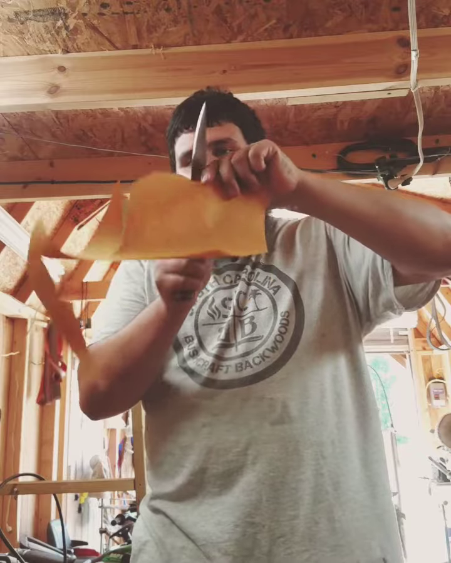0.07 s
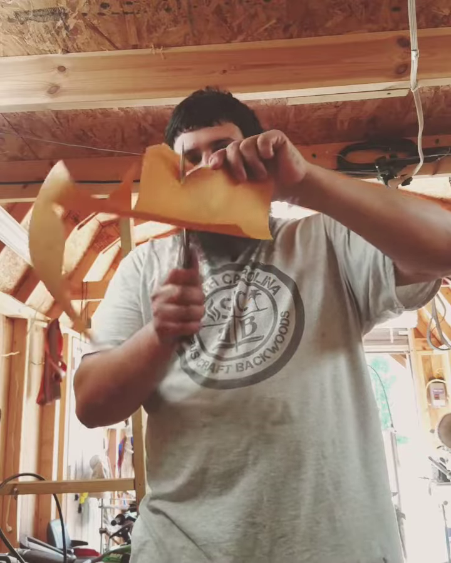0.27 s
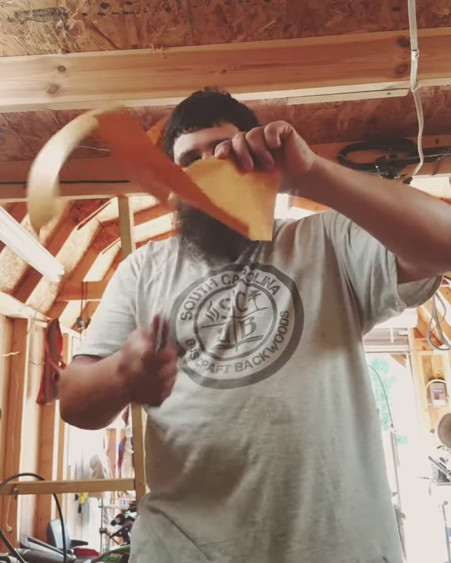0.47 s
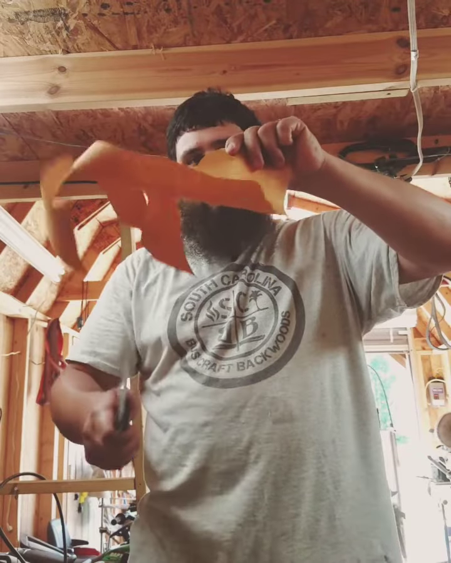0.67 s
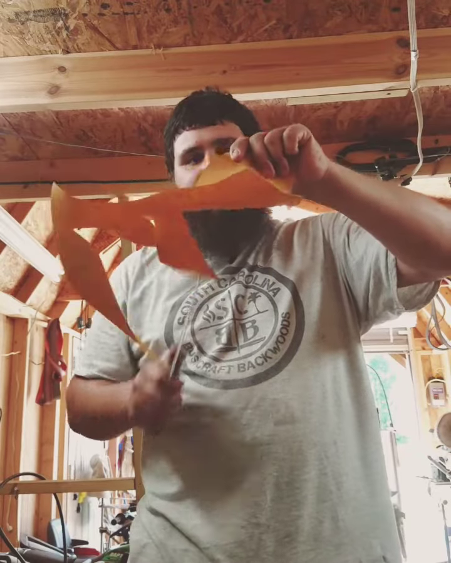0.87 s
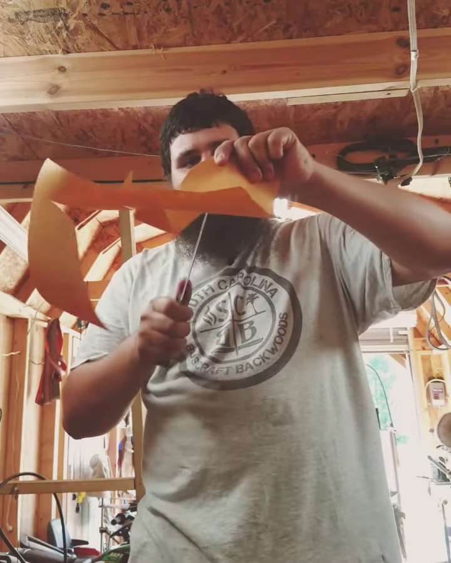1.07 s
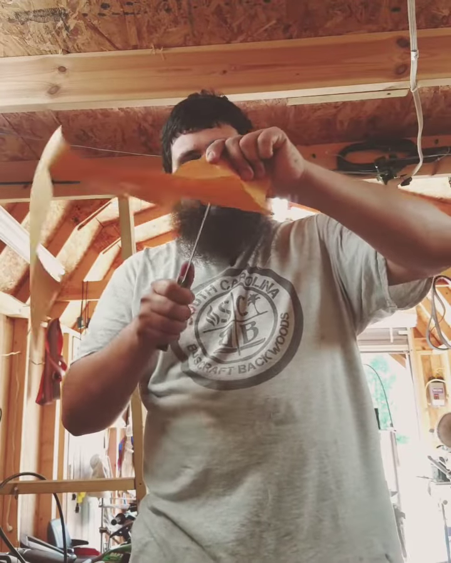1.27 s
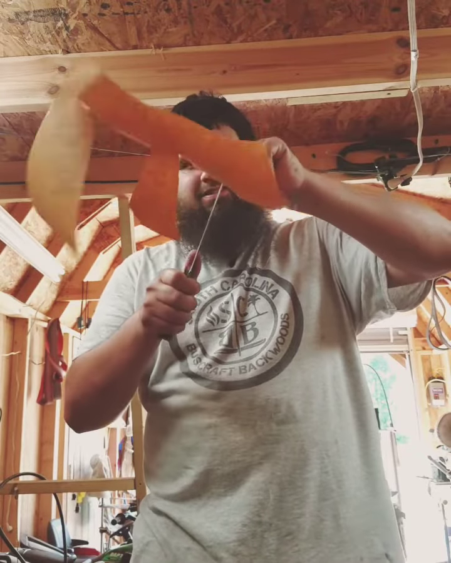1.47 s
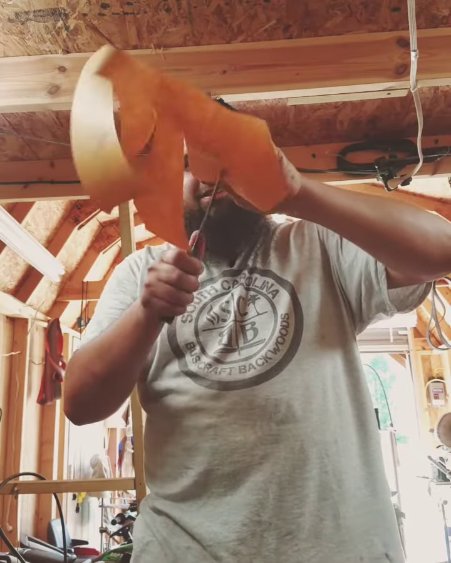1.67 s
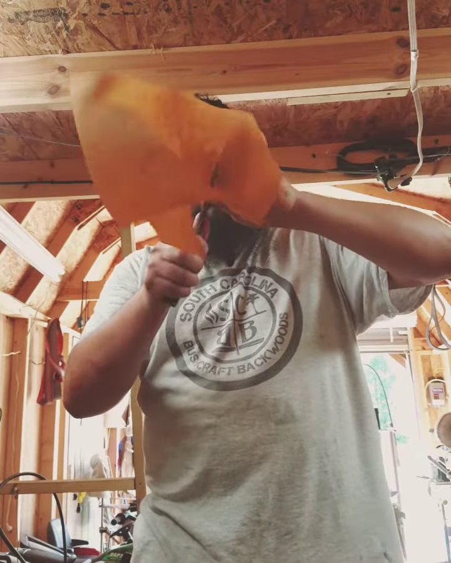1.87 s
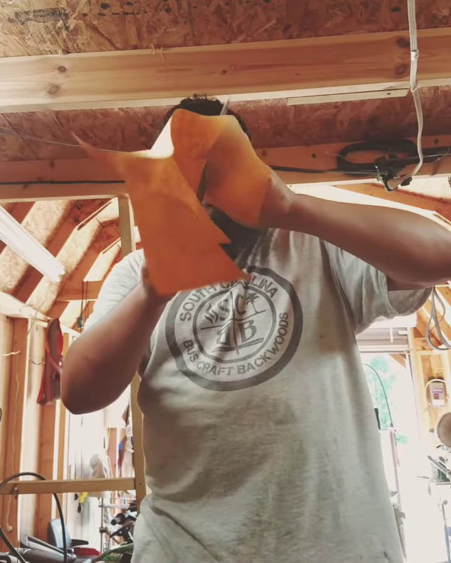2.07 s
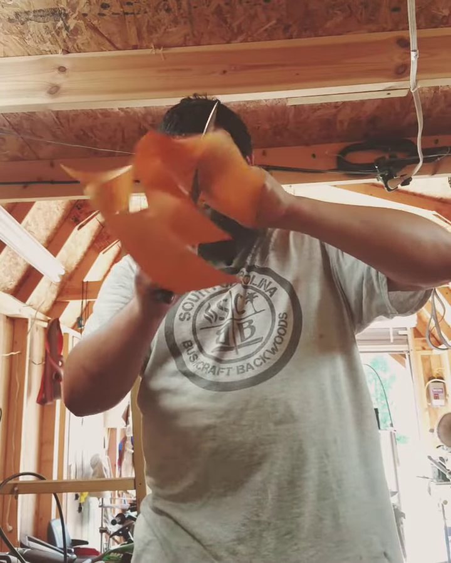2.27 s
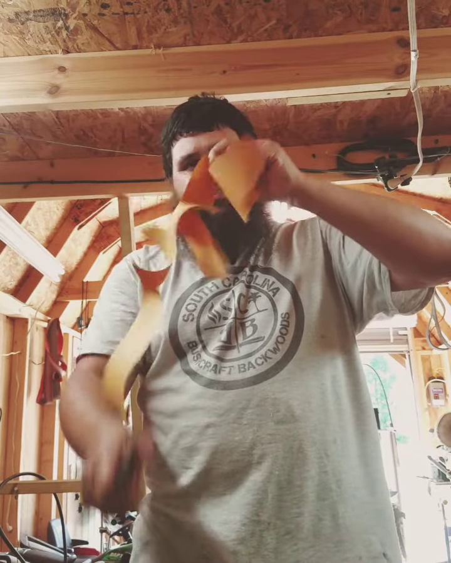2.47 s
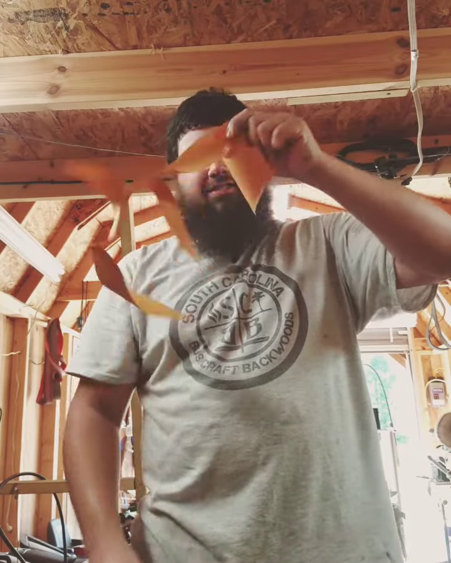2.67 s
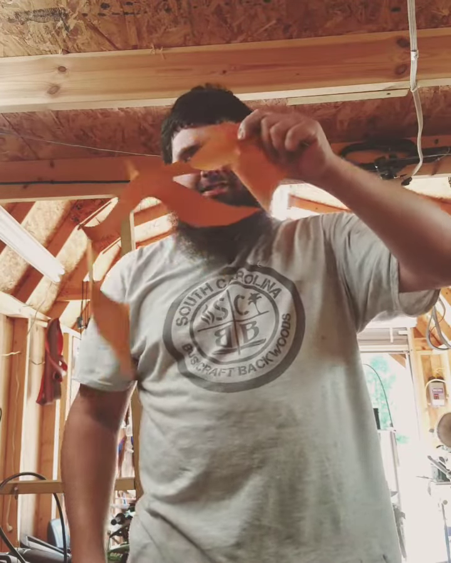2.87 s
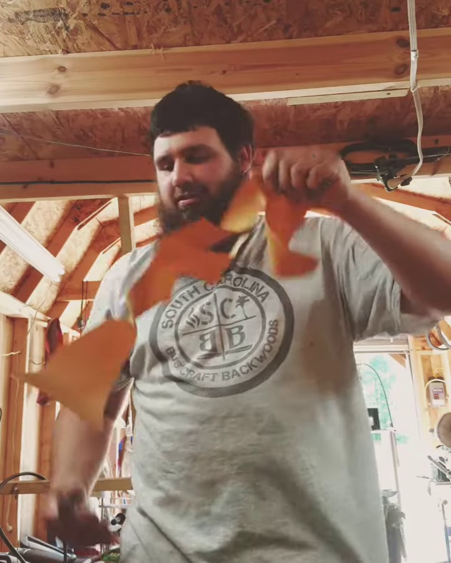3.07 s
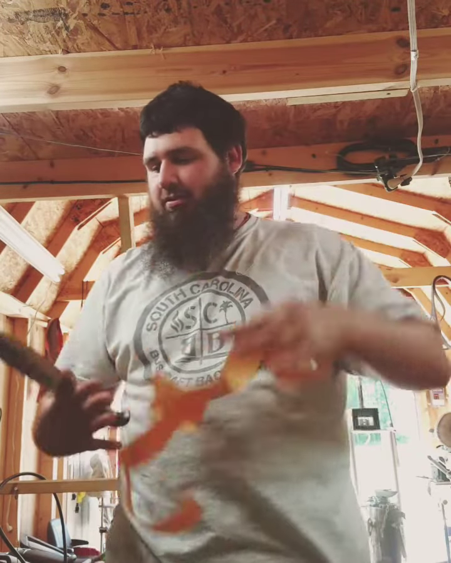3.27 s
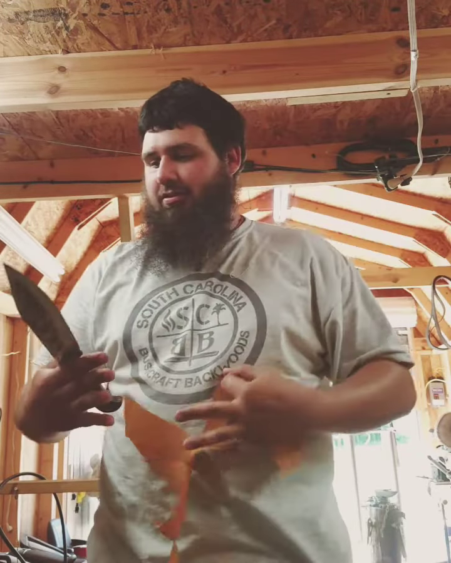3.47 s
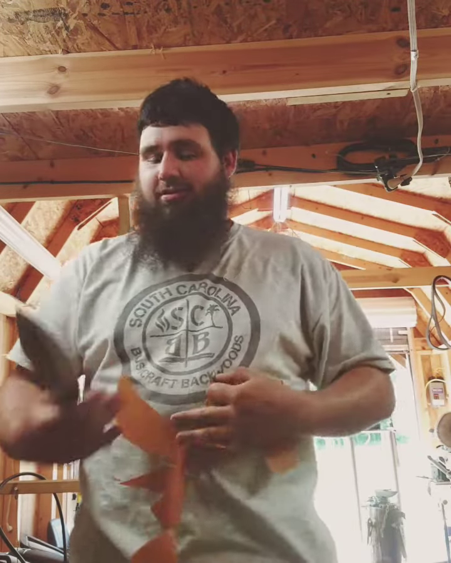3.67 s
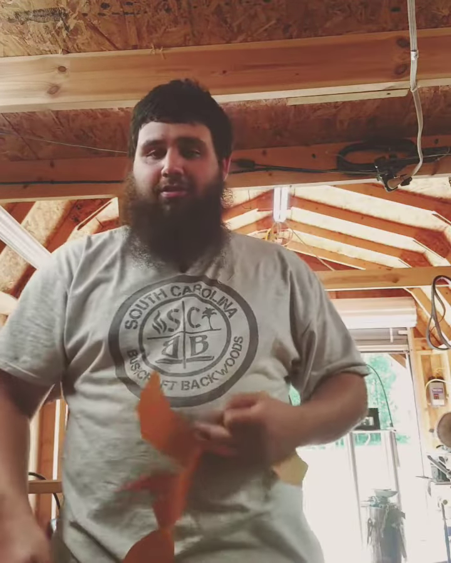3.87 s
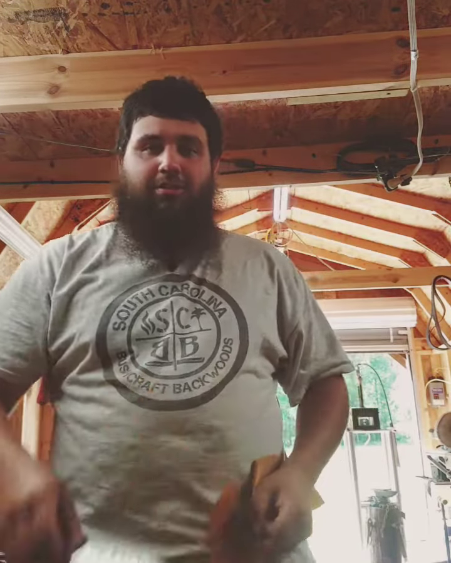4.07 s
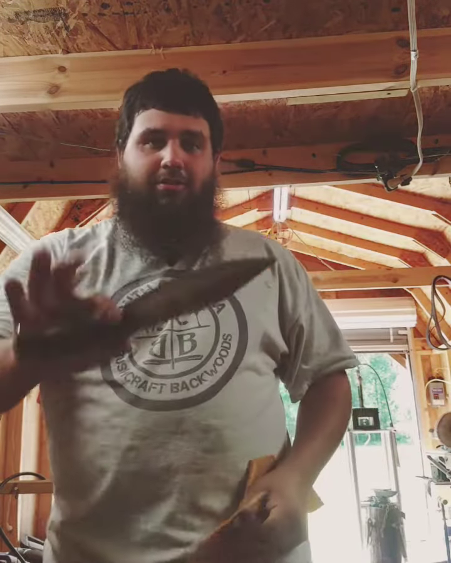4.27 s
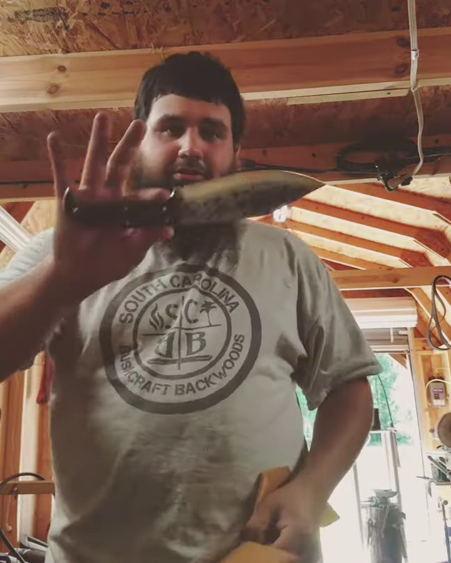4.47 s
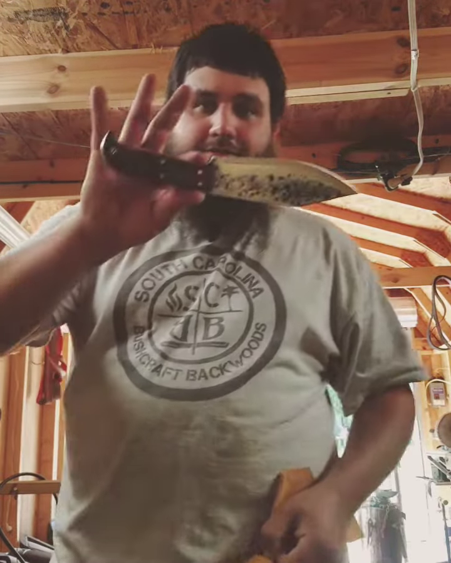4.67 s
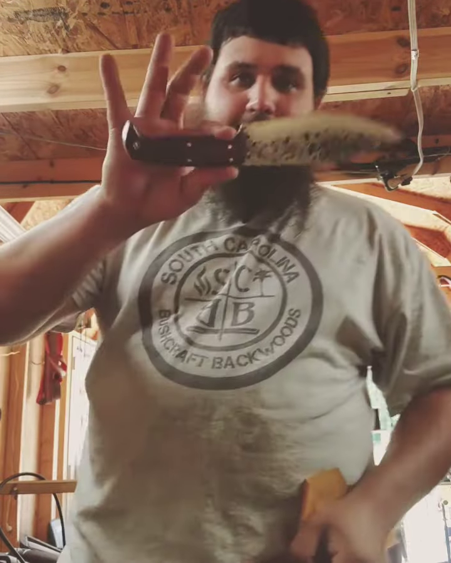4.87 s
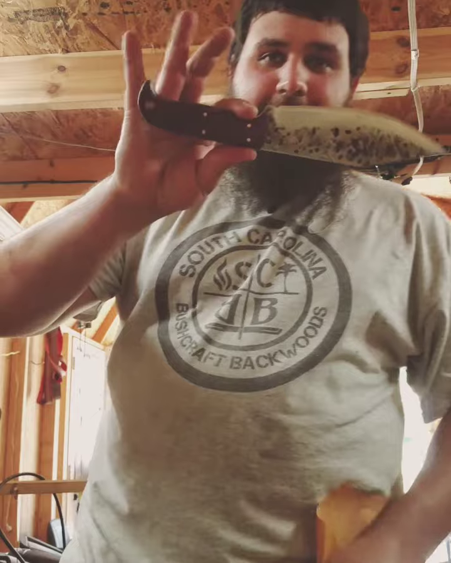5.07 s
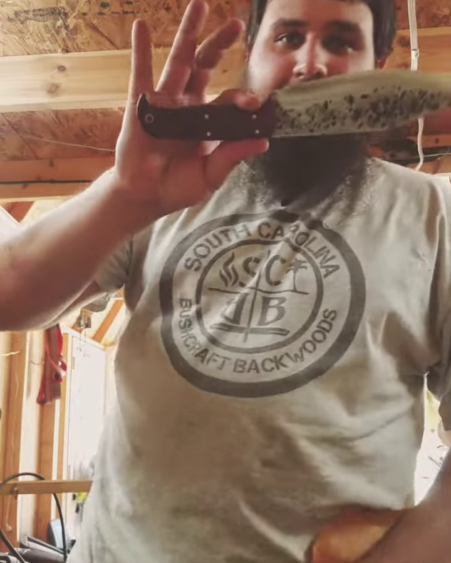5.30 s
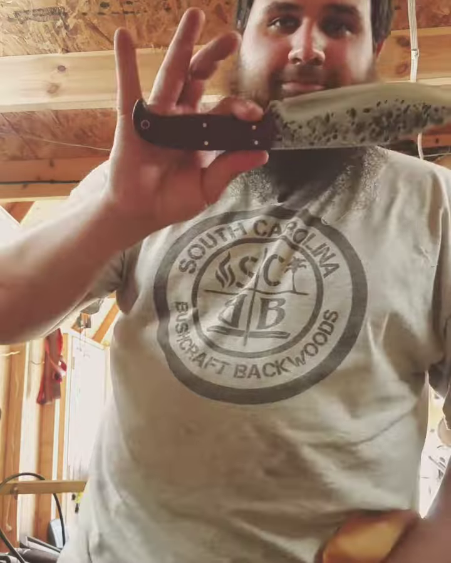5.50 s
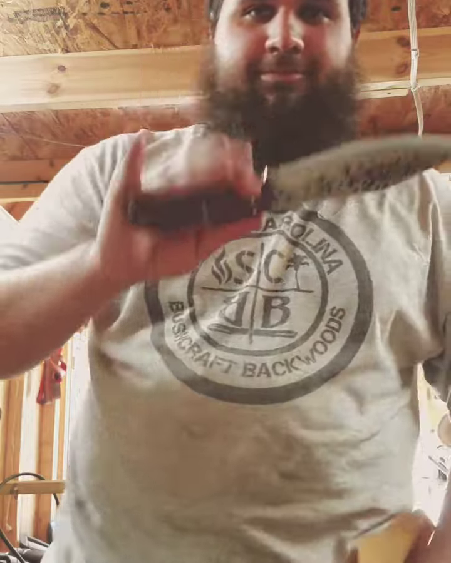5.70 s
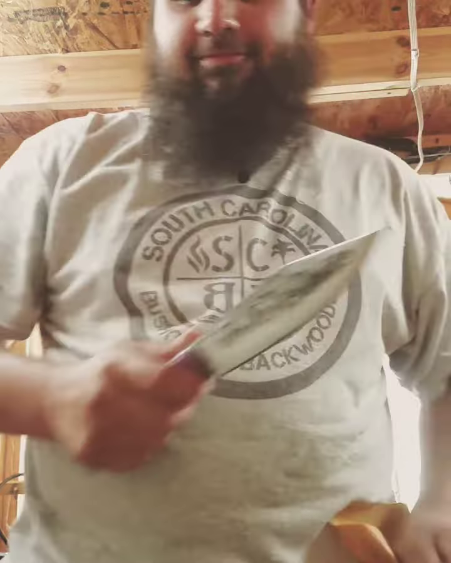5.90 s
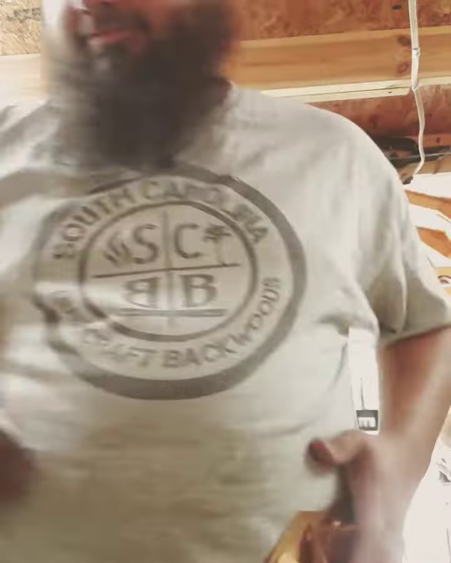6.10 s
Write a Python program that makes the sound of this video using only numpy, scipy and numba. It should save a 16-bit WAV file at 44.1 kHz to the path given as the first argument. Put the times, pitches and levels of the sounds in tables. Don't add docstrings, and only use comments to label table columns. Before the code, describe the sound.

A sharp blade slices a hand-held paper sheet in crisp ripping strokes, then scraps rustle and crumple loudly over a low fan hum.

```python
import sys
import numpy as np
from scipy import signal
from scipy.fft import rfft, irfft
from scipy.io import wavfile
from scipy.ndimage import uniform_filter1d
from numba import njit

SR = 44100
rng = np.random.default_rng(int(sys.argv[2]) if len(sys.argv) > 2 else 0)


def store_wav(level_fs):
    pcm = np.round(np.clip(np.atleast_2d(level_fs), -1, 1) * 32767)
    wavfile.write(sys.argv[1], SR, pcm.T.astype(np.int16))


def decibels_to_gain(level_db):
    exponent = np.asarray(level_db, float) / 20
    return 10 ** exponent


N = 275184
HZ = np.fft.rfftfreq(N, 1 / SR) + 1e-3

# (frequency [Hz], left level [dB], right level [dB])
PORT_RESPONSE = [(60, -4.5, 0), (150, -6, 0), (300, -1, 0), (1200, 0, 0), (3600, -5, -4), (5600, 0, 0),
                 (6700, -6, -7), (7500, -15, -18), (8150, -23, -24), (8800, -12, -13), (9800, -8, -6),
                 (12000, -11, -7), (14500, -15, -11), (14750, -52, -48)]


def on_hz(table, count=1):
    table = np.array(table)
    return np.interp(np.log(HZ), np.log(table[:, 0]), table[:, count])


def unit(x):
    return x / np.sqrt(np.mean(x ** 2))


@njit
def svf(x, hz, width_hz):
    y, b, l = np.empty(len(x)), 0., 0.
    for i in range(len(x)):
        g = np.tan(np.pi * hz[i] / SR)
        k = width_hz / hz[i]
        v = (b + g * (x[i] + 1e-18 - l)) / (1 + g * (g + k))
        b = 2 * v - b
        l = l + 2 * g * v
        y[i] = k * v
    return y


def band(x, hz, width_hz):
    hz = np.clip(hz * np.ones(N), 20, .45 * SR)
    once = svf(x, hz, 1. * width_hz)
    return svf(once, hz, 1. * width_hz)


def walk(rate_hz):
    hold = int(SR / rate_hz)
    held = np.repeat(rng.standard_normal(N // hold + 1), hold)
    slewed = uniform_filter1d(uniform_filter1d(held, hold), hold)
    return unit(slewed[:N])


def pair(a, b):
    # (frequency [Hz], correlation [-1 to 1])
    alike = [(60, -0.3), (120, -1.1), (180, 0.91), (240, 0.54), (330, 0.58), (650, 0.86), (950, -0.31),
             (1350, -0.563), (2000, 0.049), (3000, -0.11), (5000, 0.045), (15000, 0.32)]
    c = np.clip(on_hz(alike), -1, 1)
    right = irfft(c * rfft(a) + np.sqrt(1 - c ** 2) * rfft(b), N)
    return np.array([a, right])


def ports(x, power=1):
    gain = decibels_to_gain([on_hz(PORT_RESPONSE, count=1), on_hz(PORT_RESPONSE, count=2)])
    return irfft(rfft(x) * gain ** power, N)


def fan():
    # (frequency [Hz], left level [dB], right level [dB], right lead [rad])
    hum = [(57.8, -26, -22, -3.1), (78.1, -51, -47, -2.9), (96.7, -46, -49, -2.1), (116.1, -48, -47, -0.6),
           (173.3, -50, -47, -0.0), (231.7, -53, -53, 1.0), (245.3, -39, -35, -3.1), (265.6, -48, -48, 0.1),
           (317.0, -51, -49, -3.0), (347.0, -52, -47, -0.5), (520.4, -55, -52, 0.2), (531.5, -59, -52, 0.7),
           (642.2, -53, -50, -0.6), (875.3, -52, -51, -0.3), (1098.1, -61, -55, -1.3)]
    # (frequency [Hz], left level [dB], right level [dB], right lead [rad])
    mains = [(119.2, -46, -45, -3.5), (468.38, -51.5, -47.5, -0.1)]
    # (frequency [Hz], density [dB per Hz])
    air_density = [(20, -66.5), (70, -63.5), (140, -66.5), (210, -66.5), (290, -62.5), (500, -65.5),
                   (800, -66), (1100, -70), (1800, -71.5), (2600, -71.5), (3600, -75.5), (5500, -78.5),
                   (9000, -81.5), (14500, -85)]
    # (frequency [Hz], level [dB])
    left_shade = [(9000, 0), (12000, -7)]
    t, tones = np.arange(N) / SR, 0
    for hz, left_db, right_db, lead_rad in list(hum) + list(mains):
        phase = 2 * np.pi * (hz * t + rng.random()) + 0.000712 * hz ** .5 * walk(3.2)
        sway = decibels_to_gain(0.06 + 0.017 * hz ** .5 * walk(3.46))
        left = decibels_to_gain(left_db) * np.sin(phase)
        right = decibels_to_gain(right_db) * np.sin(phase + lead_rad)
        tones = tones + np.sqrt(2) * sway * np.array([left, right])
    tones = ports(tones, power=-1)
    gain = decibels_to_gain(on_hz(air_density)) * np.sqrt(SR / 2)
    air = [irfft(rfft(rng.standard_normal(N)) * gain, N) for _ in range(2)]
    left, right = pair(*air) * decibels_to_gain(.5 * walk(3.2))
    shaded = irfft(rfft(left) * decibels_to_gain(on_hz(left_shade)), N)
    return tones + np.array([shaded, right])


def snaps(rate_hz, spread_db):
    chance, sign, size = rng.random(N), rng.choice([-1., 1.], N), rng.exponential(size=N)
    return unit((chance < rate_hz / SR) * sign * decibels_to_gain(spread_db * np.minimum(size, 3)))


def modes(x, hz, table):
    drift = [1 + .012 * walk(24.96) for _ in table]
    flare = [decibels_to_gain(db + 1.5 * walk(45)) for _, _, db in table]
    out = []
    for channel in x:
        total = 0
        for k, (ratio, width_hz, _) in enumerate(table):
            total = total + (-1) ** k * flare[k] * band(channel, hz * ratio * drift[k], width_hz)
        out.append(total)
    return np.array(out)


def controls():
    # (time [s], blade pressure [dB], slack as ring re tearing [dB], sheet pitch [Hz])
    long_cut = [
        (0.154, -32, 2, 2500),
        (.2, -30, 3, 2300),
        (.25, -22, 0, 2240),
        (.31, -22.5, 1.7, 2370),
        (.5, -29, 1.2, 2460),
        (.55, -23, -10.5, 2500),
        (.605, -19.5, -7, 2380),
        (.616, -35, -4, 2400),
        (.71, -56.5, -0.5, 2200),
    ]
    hard_cut = [
        (1.532, -43.5, -2.5, 2290),
        (1.594, -34, -3, 2310),
        (1.603, -19, -9, 2370),
        (1.619, -16.5, -7.5, 2307),
        (1.715, -19, -7.5, 2250),
        (1.763, -23.5, -10.5, 2290),
        (1.832, -38.5, 2.5, 2340),
    ]
    drawn_cut = [
        (1.841, -30.5, -6, 2230),
        (1.936, -23.5, -4.5, 2270),
        (1.979, -19.5, -5, 2180),
        (2.066, -30.5, 1.5, 2140),
        (2.096, -27.5, 2, 1950),
        (2.184, -40.5, -3, 1900),
        (2.202, -33, -2.5, 1895),
        (2.264, -50, 3, 1910),
        (2.3, -39, -0.2934, 1980),
    ]
    quick_cut = [
        (2.301, -36, -2, 1980),
        (2.342, -40, -0.5, 1976),
        (2.4, -46, -3, 2060),
        (2.408, -32, -0.5, 2000),
        (2.471, -31, -3, 2145),
        (2.5, -25, -6.5, 2260),
        (2.53, -18.5, -10, 2270),
        (2.57, -29.5, -4, 2433),
        (2.606, -33, -3, 2640),
    ]
    last_rip = [
        (2.611, -27, 0, 2930),
        (2.622, -20, -5, 2973),
        (2.655, -22, -13, 2800),
        (2.68, -36, -7, 2500),
        (2.71, -47.5, -3.5, 2100),
        (2.76, -50, -6, 1990),
    ]
    # (sizzle re tearing [dB], edge pitch [Hz])
    cut_edge = [
        (-10, 5350),
        (-12, 5446.4),
        (-9, 5367.3),
        (-9.5, 5660),
        (-7.5, 5350),
    ]
    # (peak time [s], 20 dB rise [s], 20 dB fall [s], level [dB], ring re tearing [dB])
    nicks = [
        (.12, -2, 3, -61, 1),
        (.77, -2.5, -3.5, -52, -6.5),
        (.97, -4, 1.5435, -56, -3),
        (1.242, -0.3, 0.2, -41, -9),
        (1.34, .2, -1, -52, .6),
    ]
    scraps = [
        (3.16, .05, 0.976, -45.5, -2.5),
        (3.646, 0.1177, 0.42, -44, -8),
        (3.922, 0.11, 0.0111, -39, -16),
        (3.97, 0.02714, 0.815, -41.5, -10),
        (4.327, 0.47, 0.022, -38, -7.5),
        (4.52, 0.3183, 0.83, -53.5, -4),
        (5.077, 0.0944, 1.52, -40.5, -7.5),
        (5.33, 0.5, .1, -45, -2),
    ]
    grips = [
        (5.38, .06, 0.2398, -36, -8),
        (5.525, 0.12, 0.27, -27, -8),
        (5.597, 0.00965, 0.16, -23.5, -9),
        (5.665, 0.08, 0.1956, -29, -5),
        (5.77, 0.14, 0.31, -32, -10.5),
        (5.85, 0.13, 0.5584, -30.5, -8.5),
        (6.063, 0.2927, .3, -29.5, -3),
        (6.125, 0.1224, 0.1, -36, -3),
        (6.212, 0.074, 0.04046, -30, -17),
        (6.224, 0.017, 0.246, -25.5, -4),
    ]
    # (time [s], 20 dB fall [s], level [dB], ring re tearing [dB])
    bites = [
        (1.056, -0.12, -35.5, -12),
        (1.1035, 0.02, -32, -9.5),
        (1.399, 0.0123, -27, -1.5),
        (1.412, -0.02, -30.5, -5.5),
        (1.495, 0.2, -28, -6.5),
        (3.139, 0.1685, -45, -6),
        (3.934, 0.3, -38, -19),
        (4.468, 0.0089, -45, -16),
    ]
    # (sizzle re tearing [dB], edge pitch [Hz], sheet pitch [Hz])
    move_colour = [
        (-10, 5300, 2000),
        (-9.5, 5200, 2040),
        (-11.5, 5340, 2290),
        (-8.5, 5265.6, 2300),
    ]
    t = np.arange(0, N / SR, .0005)
    flat = np.ones(len(t))
    sums = decibels_to_gain(-63) ** 2 * flat * np.array([[1, 0, -8, 5000, 1950]]).T
    for cut, (sizzle_db, edge_hz) in zip([long_cut, hard_cut, drawn_cut, quick_cut, last_rip], cut_edge):
        s, db, ring_db, hz = np.transpose(cut)
        s = np.maximum.accumulate(s)
        power = decibels_to_gain(np.interp(t, s, db, left=-200, right=-200)) ** 2
        ring, pitch = np.interp(t, s, ring_db), np.interp(t, s, hz)
        sums = sums + power * np.array([flat, ring, sizzle_db * flat, edge_hz * flat, pitch])
    sudden = [(s, .002, *rest) for s, *rest in bites]
    for moves, colour in zip([nicks, scraps, grips, sudden], move_colour):
        for s, rise_s, fall_s, db, ring_db in moves:
            away = np.maximum((s - t) / abs(rise_s), (t - s) / abs(fall_s))
            power = decibels_to_gain(db - 20 * away) ** 2
            sums = sums + power * np.array([[0.95, ring_db, *colour]]).T
    tear_db = 10 * np.log10(sums[0])
    ring_db, sizzle_db, edge_hz, sheet_hz = sums[1:] / sums[0]
    sizzle_db = sizzle_db - 0.22 * ring_db - 0.034 * (tear_db + 31.5)
    flap_db = -21.5 - 0.41 * tear_db
    rows = tear_db, ring_db, sizzle_db, flap_db, edge_hz, sheet_hz
    return (np.interp(np.arange(N) / SR, t, row) for row in rows)


def slicing():
    # (ratio to edge pitch, width [Hz], level [dB])
    edge_modes = [(.8, 1040, 0), (0.917, 770.8, -3), (1.082, 720, 1.5), (1.221, 1048, -2.5)]
    # (ratio to sheet pitch, width [Hz], level [dB])
    sheet_modes = [(.6, 525, -13.5), (.85, 503, 0.5), (1.05, 505.1, 4.5), (1.35, 930, -1)]
    tear_db, ring_db, sizzle_db, flap_db, edge_hz, sheet_hz = controls()
    shared = snaps(3500, 3.5)
    own = np.array([snaps(5000, 3.373) for _ in range(2)])
    tear = unit(modes(shared + 1.63 * own, edge_hz, edge_modes))
    ring = unit(modes(shared + 1.1 * own, sheet_hz, sheet_modes)) * decibels_to_gain(ring_db)
    sizzle = unit(np.array([band(v, 10740, 15750) for v in shared + 1.16 * own]))
    sizzle = sizzle * decibels_to_gain(sizzle_db + 10.5 + 1.1 * walk(50))
    flap = unit(band(shared, 860, 1600)) * decibels_to_gain(flap_db - 4.5)
    stutter_db = 3.5 + 1.03 * walk(60) + 1.0 * walk(16)
    return (tear + ring + sizzle + flap) * decibels_to_gain(tear_db + stutter_db)


def cracks():
    # (time [s], peak level [dB], sizzle re peak [dB], pitch [Hz])
    cutting = [(0.153, -17.5, -21, 3870), (.263, -4, -25, 2570), (1.0561, -18, -12, 4830),
               (1.1075, -13.5, -27, 5169), (1.3983, -14, -25, 5610), (1.4124, -15.5, -20, 5414),
               (1.499, -22.5, -19, 4570), (1.5024, -15.5, -22, 6124), (1.5653, -10.5, -22, 4833),
               (1.5828, -7, -18, 4730), (1.603, -6, -13, 5230), (1.845, -10, -23.5, 5890),
               (2.0772, -11, -17.5, 5100), (2.4093, -14.5, -18, 2173), (2.5385, -7, -22.5, 2400),
               (2.5867, -4, -32, 2680), (2.5974, -18, -9.5, 2540), (2.616, -7, -7.5, 3952)]
    # (time [s], peak level [dB], sizzle re peak [dB], pitch [Hz])
    handling = [(3.1386, -24.5, -4.5, 5890), (3.6653, -20, -23, 5660), (3.936, -9.5, -9, 5846),
                (4.469, -17.5, -25, 5098), (5.435, -13, -25, 5620), (5.5226, -4.5, -21, 5710),
                (5.5578, -5.5, -15, 5530), (5.598, -3.5, -10.5, 5610), (5.6213, -2.5, -15, 5595),
                (5.6443, -1, -17, 5346), (5.707, -3.5, -24, 5240), (5.7618, -12, -33, 5236),
                (5.8321, -10, -21, 4894), (5.845, -7, -24, 4341), (6.0008, -11.5, -28, 5440),
                (6.0496, -7, -26, 5800), (6.1378, -9.5, -24, 5833), (6.2216, -4, -21, 5820)]
    s, peak_db, sizzle_db, hz = np.transpose(list(cutting) + list(handling))
    ring_db = np.repeat([-17, -21], [len(cutting), len(handling)]) - 0.25 * peak_db
    n, rattle_s = np.arange(400), .003
    burst = 0.33 * rng.standard_normal((len(s), 400)) * np.exp(-n / SR / rattle_s)
    burst[:, 0] = 3
    start = (s * SR).astype(int)
    parts = np.zeros((3, N))
    for part, db in zip(parts, [peak_db + 9.0, peak_db + ring_db + 17.5, peak_db + sizzle_db + 22.0]):
        np.add.at(part, start[:, None] + n, burst * decibels_to_gain(db)[:, None])
    latest = np.maximum(np.searchsorted(start, np.arange(N), side="right") - 1, 0)
    pop = band(parts[0], hz[latest], 2423.5)
    ring = band(parts[1], 3512.5, 2993)
    sizzle = band(parts[2], 12521, 7000)
    return pop + ring + sizzle


def shop(lag_s):
    t60_s, tail_db, onset_s = 0.2, -6.5, 0.0012
    t = np.arange(SR // 2) / SR
    tail = rng.standard_normal(len(t)) * decibels_to_gain(-60 * t / t60_s) * np.clip(t / onset_s, 0, 1)
    path = decibels_to_gain(tail_db) * tail / np.sqrt(np.sum(tail ** 2))
    path[int(lag_s * SR)] += 1
    return path / np.sqrt(np.sum(path ** 2))


def steps():
    # (time [s], level [dB], t60 [s])
    footfalls = [
        (4.747, -24, 0.16),
        (5.485, -20, 0.1735),
        (5.946, -24.5, 0.1636),
        (5.983, -23.5, 0.18),
        (6.062, -29, 0.21),
    ]
    # (frequency [Hz], level [dB])
    boards = [(105, -2.5), (145, 3.5), (185, -9), (290, -8), (430, -16)]
    t, out = np.arange(N) / SR, np.zeros(N)
    for s, db, t60_s in footfalls:
        late_s = np.maximum(t - s, 0)
        ring = 0
        for hz, mode_db in boards:
            struck_hz = hz * (1 + 0.038 * rng.standard_normal())
            ring = ring + decibels_to_gain(mode_db) * np.sin(2 * np.pi * struck_hz * late_s)
        out += ring * decibels_to_gain(db - 60 * late_s / t60_s) * (1 - np.exp(-late_s / 0.01258))
    return out * decibels_to_gain([[-11.0], [0]])


def scene():
    background = fan()
    tearing = slicing()
    pops = cracks()
    bench_s, bench_db = 0.0025, -7
    paper = tearing + pops + decibels_to_gain(bench_db) * np.roll(pops, int(bench_s * SR))
    paths = shop(lag_s=0), shop(lag_s=.00006)
    heard = [signal.fftconvolve(p, h)[:N] for p, h in zip(paper, paths)]
    return pair(*heard) + background + steps()


def low_pass(x):
    return signal.sosfilt(signal.butter(12, 15300, fs=SR, output="sos"), x)


def record(dry):
    heard = ports(dry)
    loud = np.sqrt(uniform_filter1d(np.mean(heard ** 2, axis=0), int(.12 * SR)))
    held = heard * np.minimum(1, 0.16 / loud) ** .3
    rounded = .8 * np.tanh(held / .8)
    return low_pass(rounded)


dry = scene()
out = record(dry)
store_wav(out)
```